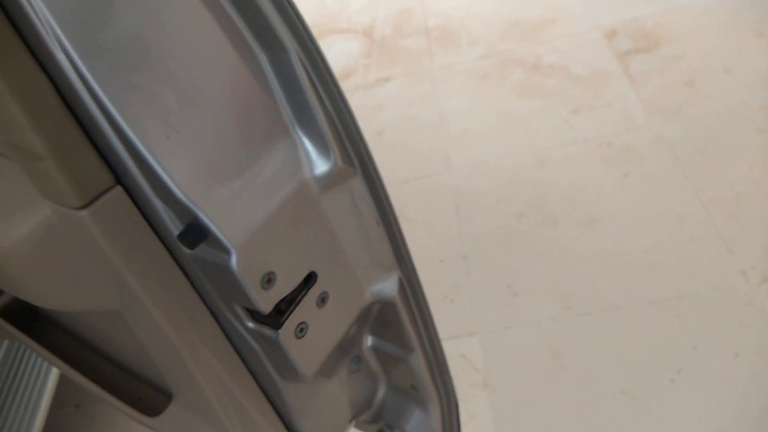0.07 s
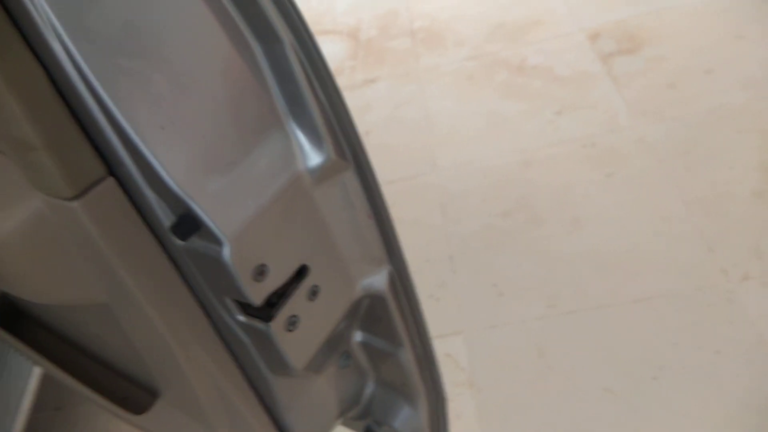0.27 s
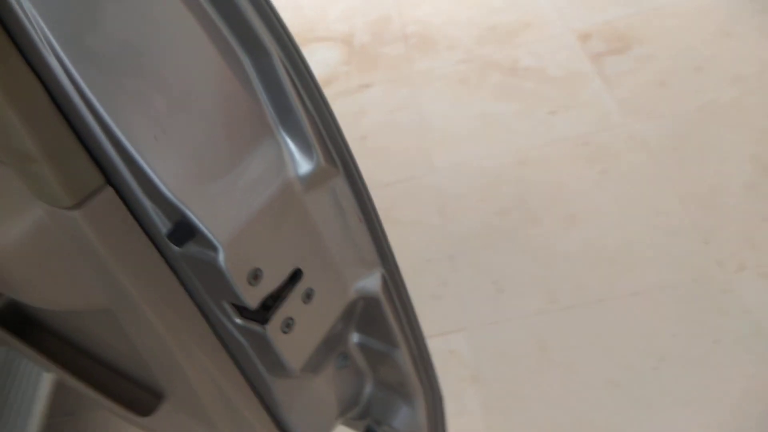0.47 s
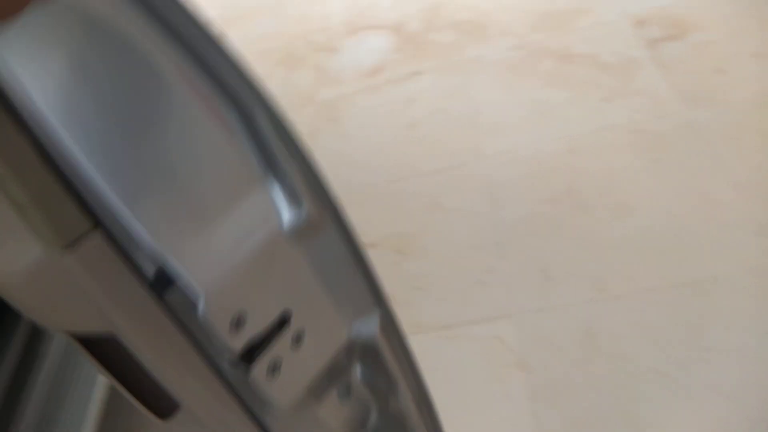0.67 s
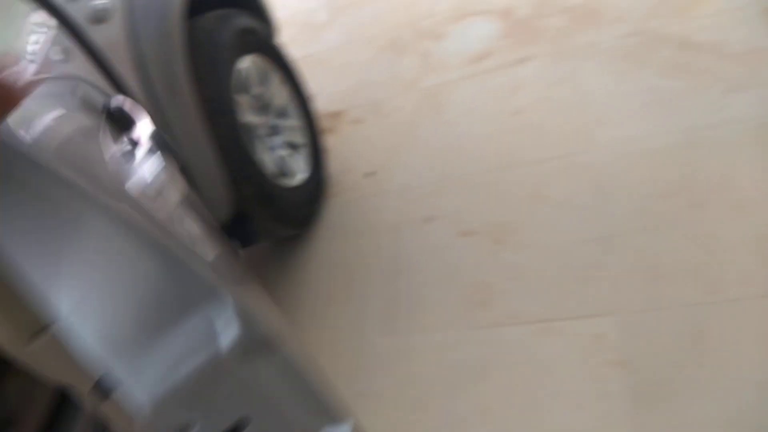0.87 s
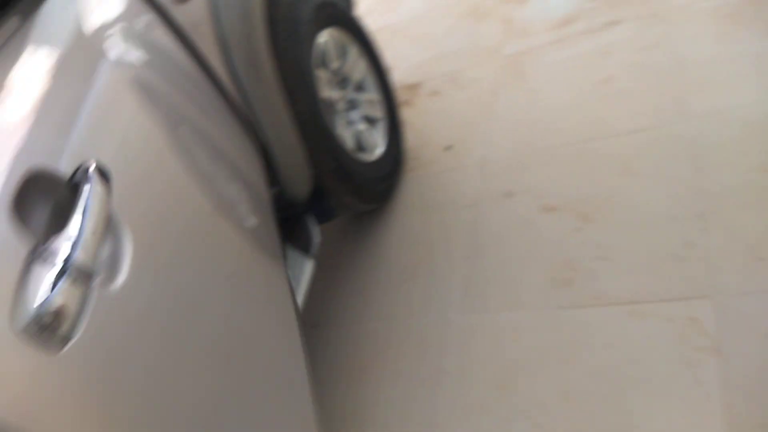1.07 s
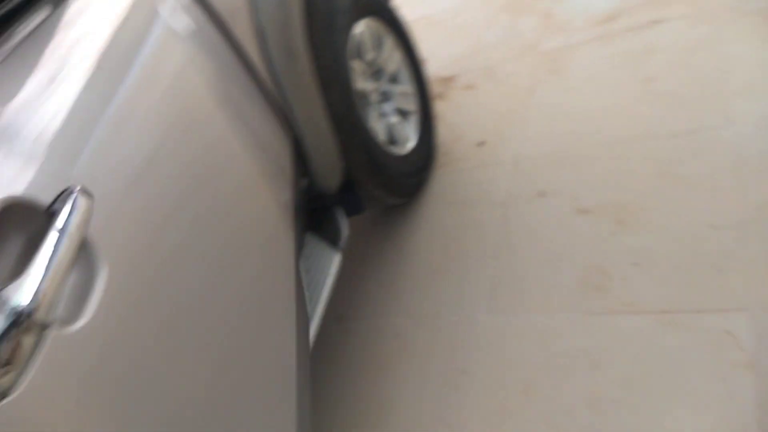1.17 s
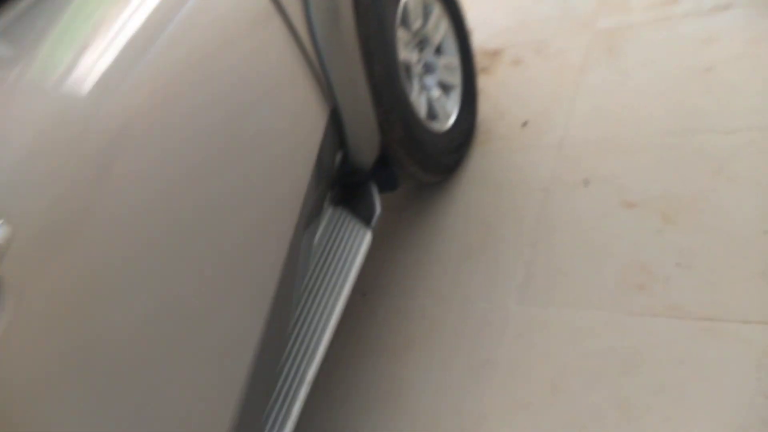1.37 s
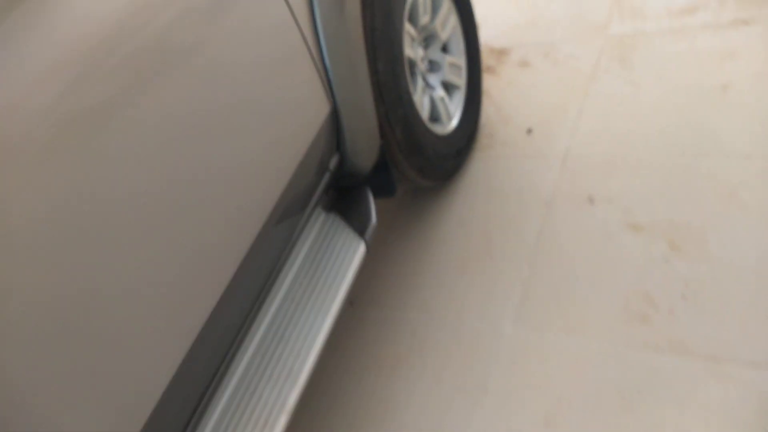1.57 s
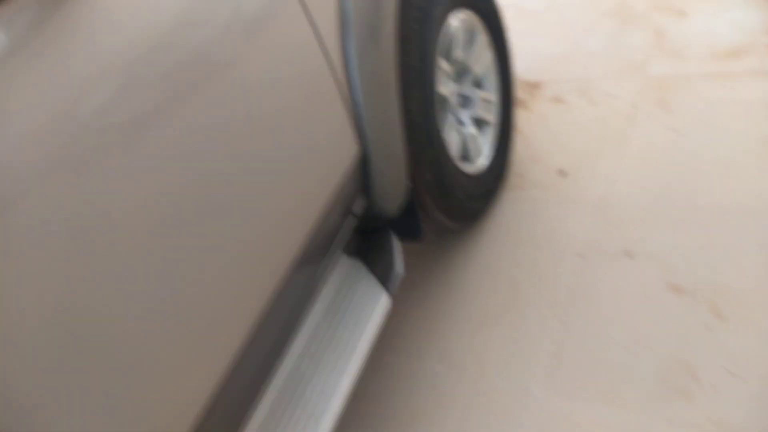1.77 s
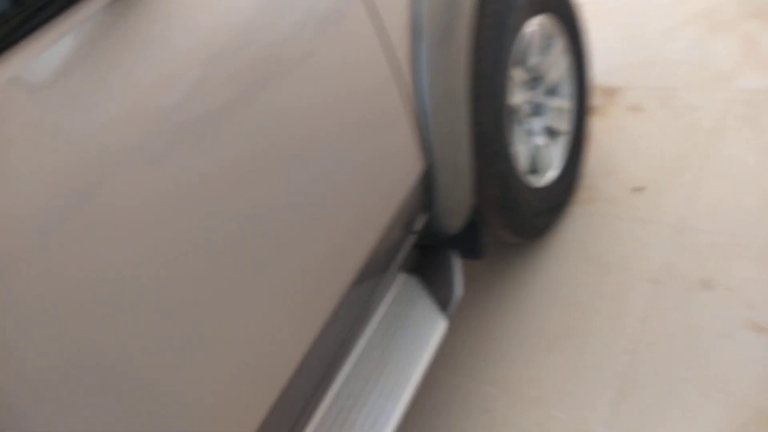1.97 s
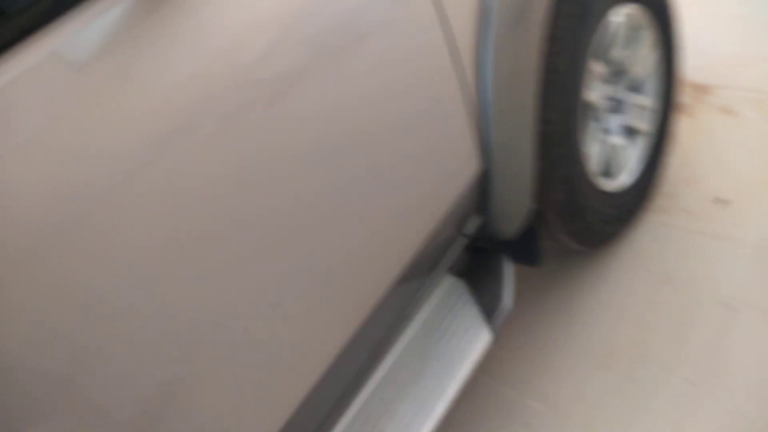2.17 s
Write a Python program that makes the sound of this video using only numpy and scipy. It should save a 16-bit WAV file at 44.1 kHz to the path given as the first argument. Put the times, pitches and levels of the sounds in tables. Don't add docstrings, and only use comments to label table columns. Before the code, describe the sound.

One heavy car door slam at arm's length: a faint vehicle drone recedes first, then a deep thud with a metallic latch clack and air puff, ringing briefly off walls of a paved forecourt, phone microphone.

```python
import sys
import numpy as np
from scipy import signal
from scipy.fft import rfft, irfft, next_fast_len
from scipy.io import wavfile
from scipy.ndimage import uniform_filter1d

SR = 44100
rng = np.random.default_rng(int(sys.argv[2]) if len(sys.argv) > 2 else 0)


def bounce(signal):
    frames = np.transpose(np.atleast_2d(signal))
    limited = np.clip(frames, -1, 1)
    pcm = np.round(limited * 32767).astype(np.int16)
    wavfile.write(sys.argv[1], SR, pcm)


def nominal_scale(level):
    x = np.asarray(level, float) / 20
    return 10 ** x


N = 97681
T, SIZE = np.arange(N) / SR, 2 * next_fast_len(N, True)
HZ = np.maximum(np.arange(SIZE // 2 + 1) * SR / SIZE, 1.)
TOP_HZ = 15700


# t/s, level/dB, contact/ms, direction (signed share)
SHELL_BLOWS = [(1.6700, -1, 2.4, -1), (1.6735, -1, 1.2, 0.7), (1.6755, -5, 1.6, 0.7),
               (1.6773, -1, 1.9, -0.8), (1.684, -4, 2.15, 0.23), (1.693, -8, 2.03, 1),
               (1.6995, -7, 5, -0.96), (1.7052, -0.5, 2.5, 1), (1.7094, -3, 1.8, -0.75),
               (1.7120, -5, 1.6, -0.7), (1.716, -14.5, 2.1, 0.92), (1.719, -5.5, 1.75, -0.98),
               (1.7267, -3.5, 2.2, 1), (1.7352, -8, 2.5, 1), (1.7517, -9, 2.3, -1), (1.7566, -7, 3, 1),
               (1.7685, -15, 2, 1), (1.7828, -11, 2.1, 1)]
# f/Hz, level/dB, t60/s
SHELL_MODES = [(102, 2, 0.074), (150, -51, 0.082), (195.3, -4.5, 0.1), (213, -21, 0.13), (262, -10, 0.059),
               (339, -6, 0.074), (447, -41, 0.11), (467, 4, 0.039), (515, -17, 0.11), (620, -2.5, 0.095),
               (686, -9, 0.26), (907, -10, 0.027)]


def shell():
    force, slap = 0, 0
    for s, db, ms, way in SHELL_BLOWS:
        blow = way * push(s, db, ms)
        force = force + blow
        slap = slap + ms * SR / 1571 * blow
    slap = signal.sosfilt(signal.butter(1, 110., "high", fs=SR, output="sos"), slap)
    return nominal_scale(-11) * ring(force, SHELL_MODES) + nominal_scale(2.5) * slap


# t/s, level/dB
LATCH_CLICKS = [
    (1.6735, -22),
    (1.6785, -24),
    (1.6848, -23),
    (1.6935, -22),
    (1.6975, -32),
    (1.7056, -34),
    (1.7095, -33),
    (1.722, -36),
    (1.7515, -39),
]
# f/Hz, level/dB, t60/s
LATCH_MODES = [(1350, -5, .025), (1620, 0, .035), (2200, -8, .02), (2750, -1, .025), (3600, -9, .012),
               (4500, -15, .01)]
# f/Hz, level/dB, t60/s
BITE_MODES = [(900, -2, .04), (1600, -5, .025), (2700, 0, .016), (3800, -9, .012)]


def latch():
    clicks = sum((-1) ** k * push(s, db, 0.087) for k, (s, db) in enumerate(LATCH_CLICKS))
    bite = push(1.6716, -11, 0.095)
    return ring(clicks, LATCH_MODES) + ring(bite, BITE_MODES)


# t/s, level/dB
SEAL_TOUCHES = [
    (1.6498, -16.5),
    (1.6522, -15),
    (1.6546, -21),
    (1.657, -27),
]
# f/Hz, level/dB, t60/s
TRIM_MODES = [(441, -3.5, 0.048), (894, -13.5, 0.088), (1280, -18.5, 0.037), (1820, -15, 0.017)]


def trim():
    return ring(sum(push(s, db, 0.28) for s, db in SEAL_TOUCHES), TRIM_MODES)


# t/s, level/dB
PUFF_EFFORT = [(1.657, -50), (1.666, -35), (1.674, -23), (1.6865, -27), (1.690, -29), (1.696, -29),
               (1.702, -33), (1.707, -24), (1.724, -34.5), (1.74, -56), (1.754, -40), (1.78, -60)]
# f/Hz, level/dB
PUFF_COLOUR = [(410, -26), (700, -28.5), (874, -8.5), (1190, -19), (2750, -18.5), (6180, -26), (9750, -49),
               (12200, -38), (15800, -36.5)]


def puff():
    effort_db = np.interp(T, *np.array(PUFF_EFFORT).T, left=-140, right=-140)
    grain_db = 3.1 * walk(300)
    colour = nominal_scale(on_log(PUFF_COLOUR, HZ)) * np.minimum(HZ / 700, 1) ** 4
    return nominal_scale(effort_db + grain_db) * unit(shape(pair(), colour))


# t/s, length/s, f/Hz, level/dB
SETTLING = [(1.805, .03, 85, -29), (1.83, .035, 150, -30), (1.965, .025, 200, -38), (2.07, .03, 90, -45),
            (1.82, .025, 420, -32), (1.87, .03, 400, -37), (2.01, .015, 420, -42), (1.90, .025, 930, -46),
            (1.885, .04, 240, -34), (1.925, .03, 100, -36), (1.925, .03, 420, -39), (1.96, .025, 490, -41),
            (1.995, .04, 150, -40), (2.03, .03, 400, -45), (1.97, .025, 3850, -58), (2.2, .02, 4400, -60),
            (1.755, .012, 3600, -44), (2.10, .045, 260, -43), (2.15, .04, 350, -48)]


def settle():
    return swells(SETTLING)


# f/Hz, t60/s
WALL_DECAY = [(60, .7), (120, .7), (250, .85), (500, .75), (1000, .5), (3500, .45), (8000, .45),
              (15000, .4)]
# f/Hz, level/dB
WALL_COLOUR = [(60, -1.5), (100, -8), (200, 1), (450, 0), (1000, -4.5), (4000, -4), (8000, -4),
               (15000, 5.5)]
# f/Hz, level/dB
FAR_COLOUR = [(250, -15), (700, -3), (1500, -1), (4000, -0.5), (8000, -3.5), (15000, -0.5)]


def walls(x):
    gap_s, far_t60_s = 0.016, 1.51
    echoes, noise = 0, pair()
    for hz in OCTAVES:
        near = nominal_scale(on_log(WALL_COLOUR, hz)) * unit(fade(T, on_log(WALL_DECAY, hz)))
        far = nominal_scale(on_log(FAR_COLOUR, hz)) * unit(fade(T, far_t60_s))
        lumps = nominal_scale(2.5 * walk(45))
        echoes = echoes + lumps * shape(noise, octave(hz)) * np.hypot(near, far) / np.sqrt(N)
    onset = np.clip(T / gap_s - 1, 0, 1)
    return nominal_scale(-9) * shape(x, rfft(echoes * onset, SIZE))


# t/s, length/s, level/dB
HAND_RUSTLES = [
    (.92, .04, -65),
    (1.452, .012, -70),
    (1.545, .025, -70),
    (1.865, .025, -55),
    (2.08, .05, -65),
    (2.2, .024, -55),
]
# f/Hz, level/dB
RUSTLE_COLOUR = [(700, -30), (2000, -8), (6000, -8), (9000, -18), (14500, 0)]


def rustles():
    hiss = unit(shape(pair(), nominal_scale(on_log(RUSTLE_COLOUR, HZ)) * (HZ < TOP_HZ)))
    return hiss * sum(nominal_scale(db) * bump(s, length) for s, length, db in HAND_RUSTLES)


def squeak():
    start_s, length_s, low_hz, rise_hz = 1.372, .045, 5600, 3000
    progress = np.clip((T - start_s) / length_s, 0, 1)
    phase = 2 * np.pi * np.cumsum(low_hz + rise_hz * progress + 230.0 * walk(370)) / SR
    level = nominal_scale(-76 + 3. * walk(100)) * bump(start_s + length_s / 2, length_s * 1.5)
    return level * np.sin(phase)


# t/s, level/dB
RECEDING = [(0, -51), (.3, -56), (.6, -60.5), (.9, -64), (1.2, -70), (1.6, -74)]
# f/Hz, level/dB
WASH_COLOUR = [(30, -21), (150, -6.5), (400, -8.5), (600, -4.5), (1000, -6), (2200, -10.5), (4500, -24.5),
               (8000, -44.5)]
# f/Hz, width/Hz, level/dB
DRONE_BANDS = [(158.3, 13, -2.5), (567, 24, -4), (604, 180, 1.5), (860, 20, -3), (1169, 38, -5)]


def vehicle():
    wash = nominal_scale(7.5) * patchy(WASH_COLOUR, 1.34)
    drone = 0
    for hz, width, db in DRONE_BANDS:
        drone = drone + nominal_scale(db + 1.6 * walk(24.7)) * narrow(hz, width)
    return nominal_scale(np.interp(T, *np.array(RECEDING).T)) * (wash + nominal_scale(-4) * drone)


# t/s, f/Hz, level/dB
HUM_TRACK = [(0.12, 285.7, -60), (0.24, 291.0, -57.5), (0.278, 290.8, -50.5), (0.384, 283.0, -62),
             (0.414, 281.0, -55), (0.438, 281.7, -66), (0.456, 279.1, -56.5), (0.632, 278.7, -65),
             (0.72, 278.9, -58), (0.792, 278.4, -64), (0.8, 280.0, -61), (1.146, 275.1, -67),
             (1.268, 297.3, -70), (1.36, 281.8, -59), (1.406, 271.4, -66.5), (1.486, 283.7, -59.5),
             (1.558, 287.9, -65), (1.63, 279.1, -61)]
# multiple (of the pitch), level/dB
HUM_OVERTONES = [(1, 0), (2, -5), (3, -20), (4, -11)]


def hum():
    s, hz, db = np.array(HUM_TRACK).T
    pitch = np.interp(T, s, hz) * (1 + 0.0163 * walk(39.72))
    phase = 2 * np.pi * np.cumsum(pitch) / SR
    level_db = np.interp(T, s, db)
    tone = sum(nominal_scale(level_db + rel + 2.2 * walk(25.2)) * np.sin(k * phase) for k, rel in HUM_OVERTONES)
    return np.sqrt(2) * tone


# t/s, length/s, f/Hz, level/dB
FAR_KNOCKS = [(.06, .05, 295, -38), (.05, .03, 565, -42), (.035, .03, 160, -48), (.135, .02, 670, -43),
              (.255, .025, 572, -41.5), (.32, .035, 835, -53), (.80, .025, 100, -53), (.42, .03, 2600, -62),
              (.012, .03, 2200, -56), (.115, .03, 1980, -56), (.1, .025, 860, -52), (.2, .025, 870, -52),
              (.09, .025, 60, -52), (.38, .02, 150, -54), (.45, .02, 150, -55), (1.35, .025, 160, -59),
              (.215, .02, 150, -54), (.3, .025, 70, -53), (.5, .03, 585, -52), (.615, .025, 880, -56)]


def knocks():
    return swells(FAR_KNOCKS)


# f/Hz, level/dB
FLOOR_COLOUR = [(30, -24), (70, -11), (130, -7), (220, -12), (400, -15), (700, -15), (2000, -19),
                (5000, -32), (8000, -42.5)]
# f/Hz, level/dB
HISS_COLOUR = [(4000, 0), (7500, -19), (10000, -16), (12500, -9), (15000, -4)]


def quiet():
    fizz_s, fizz_t60_s = 1.74, 6.
    fizz = nominal_scale(-64 + 2.2 * walk(12.07)) * (T > fizz_s) * fade(T - fizz_s, fizz_t60_s)
    hiss = unit(shape(pair(), nominal_scale(on_log(HISS_COLOUR, HZ)) * (HZ < TOP_HZ)))
    return nominal_scale(-57) * patchy(FLOOR_COLOUR, 1.7) + (nominal_scale(-69.5 + 0.23 * walk(12)) + fizz) * hiss


def push(s, db, ms):
    u = (T - s) / ms * 1000
    return nominal_scale(db) * np.sin(np.pi * np.clip(u, 0, 1)) * np.pi / 2 / (ms * SR / 1000)


def ring(x, modes):
    response = 0
    for k, (hz, db, t60) in enumerate(modes):
        response = response + (-1) ** k * nominal_scale(db) * np.sin(2 * np.pi * hz * T) * fade(T, t60)
    return shape(x, rfft(response, SIZE))


def fade(t, t60):
    return 1000. ** (-t / t60)


def bump(s, length):
    return np.exp(-((T - s) / length * 2) ** 2)


def swells(table):
    bursts = sum(nominal_scale(db) * bump(s, length) * np.sin(2 * np.pi * hz * (T - s)) for s, length, hz, db in table)
    return np.sqrt(2) * bursts


# f/Hz, coherence (held to 0-1)
PORT_LIKENESS = [(60, 0.4), (250, 2.4), (500, 1.05), (1000, 0.1855), (2500, 0), (9000, -2.4)]
LATE = np.exp(-2j * np.pi * HZ * 0.0004015 * HZ / (HZ + 370.0))


def pair():
    c = np.clip(on_log(PORT_LIKENESS, HZ), 0, 1)
    mid = rfft(rng.standard_normal(SIZE)) * np.sqrt((1 + c) / 2)
    side = rfft(rng.standard_normal(SIZE)) * np.sqrt((1 - c) / 2)
    return irfft(np.array([(mid + side) * LATE, mid - side]), SIZE)[:, :N]


def narrow(hz, width):
    return unit(shape(pair(), 1 / (1 + (2 * (HZ - hz) / width) ** 2)))


OCTAVES = 30 * 2 ** np.arange(0, 10)


def octave(hz):
    return np.cos(np.pi / 2 * np.clip(np.log2(HZ / hz), -1, 1)) ** 2


def patchy(colour, flicker_db):
    noise = shape(pair(), nominal_scale(on_log(colour, HZ)))
    return unit(sum(nominal_scale(flicker_db * walk(14.65)) * shape(noise, octave(hz)) for hz in OCTAVES))


def walk(rate):
    k = int(SR / rate)
    steps = np.repeat(rng.standard_normal(N // k + 1), k)
    return unit(uniform_filter1d(uniform_filter1d(steps, k), k)[:N])


def on_log(table, hz):
    x, y = np.array(table).T
    return np.interp(np.log(hz), np.log(x), y)


def shape(x, gain):
    return irfft(rfft(x, SIZE) * gain, SIZE)[..., :N]


def unit(x):
    return x / np.sqrt(np.mean(x ** 2))


# f/Hz, level/dB
LEFT_EXCESS = [(60, 0.5), (300, -0.5), (700, -2), (1290, 11), (2400, 5), (4400, 6.5), (8100, 2.5),
               (15000, 15)]


def scene():
    body, steel, air = shell() + trim(), latch(), puff()
    half = nominal_scale(on_log(LEFT_EXCESS, HZ) / 2)
    tones = body + steel + settle() + knocks() + hum()
    near = shape(tones, np.array([half * LATE, 1 / half])) + shape(air, np.array([half, 1 / half]))
    echoes = walls(body + nominal_scale(-15) * steel + air[1])
    return near + echoes + vehicle() + rustles() + squeak() + quiet()


def band_limit(x):
    return signal.sosfilt(signal.butter(12, 16000, fs=SR, output="sos"), x)


def record(dry):
    ceiling, edge_hz = 1.15, 120
    dry = signal.sosfilt(signal.butter(2, 45., "high", fs=SR, output="sos"), dry)
    dry = dry / (1 + (np.abs(dry) / ceiling) ** 4) ** (1 / 4)
    mix = shape(dry, np.clip((TOP_HZ - HZ) / edge_hz, 0, 1))
    return band_limit(mix)


dry = scene()
out = record(dry)
bounce(out)
```